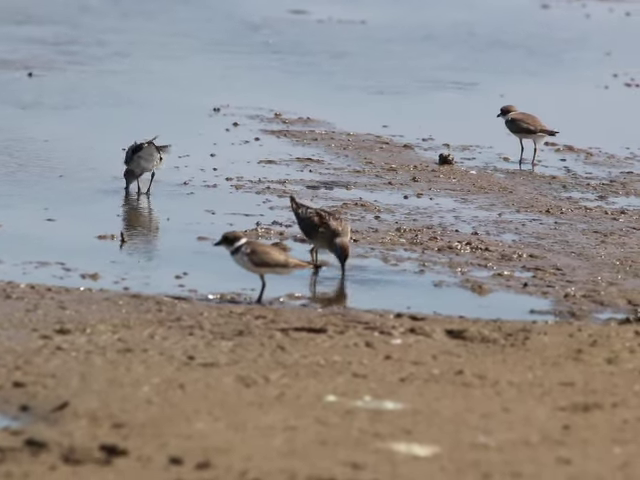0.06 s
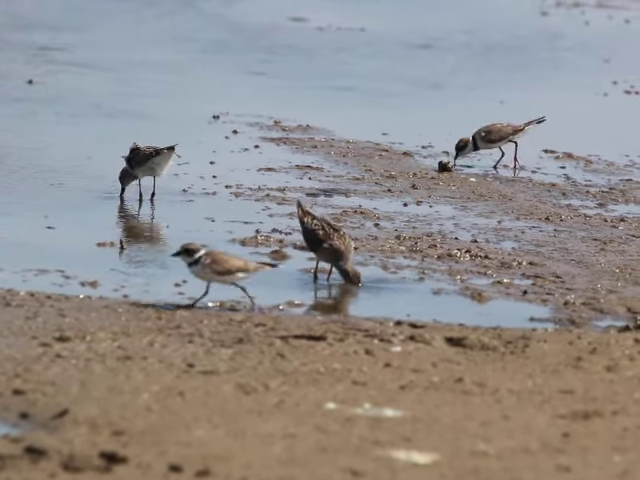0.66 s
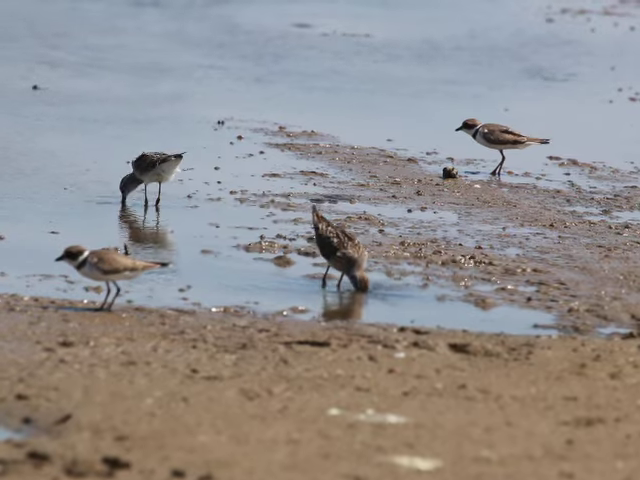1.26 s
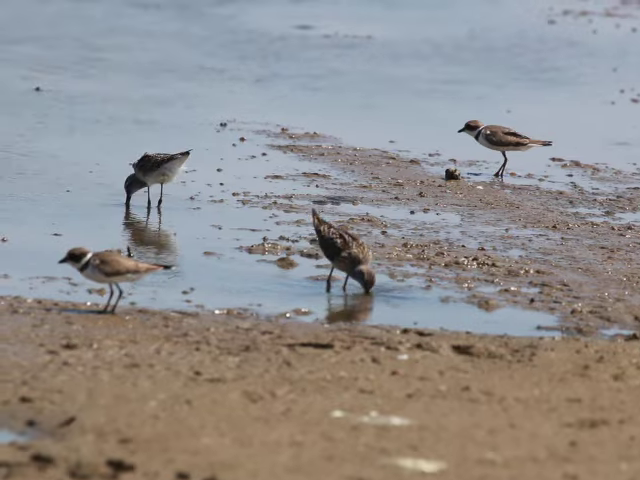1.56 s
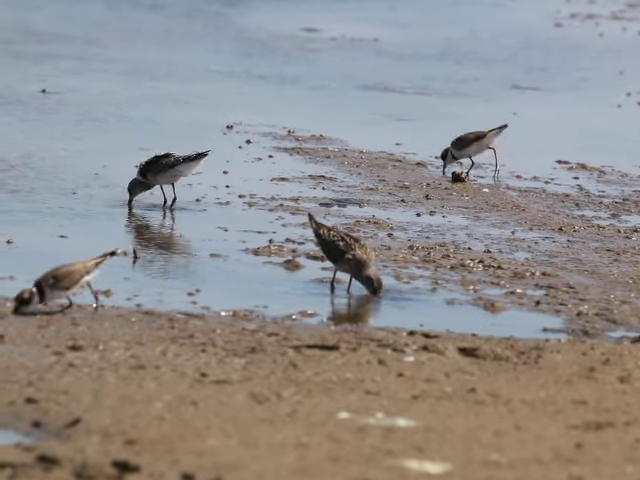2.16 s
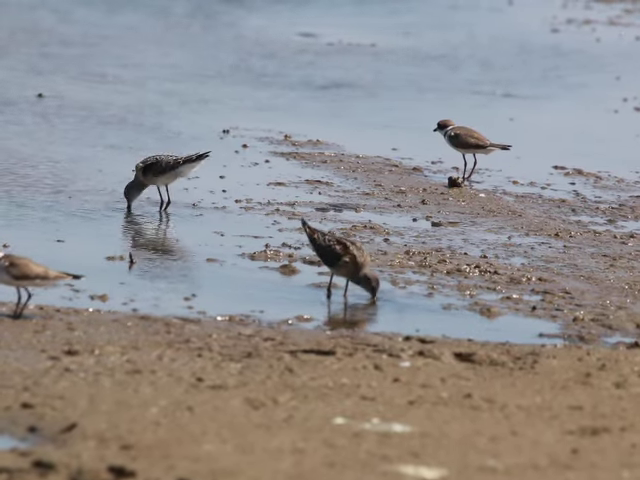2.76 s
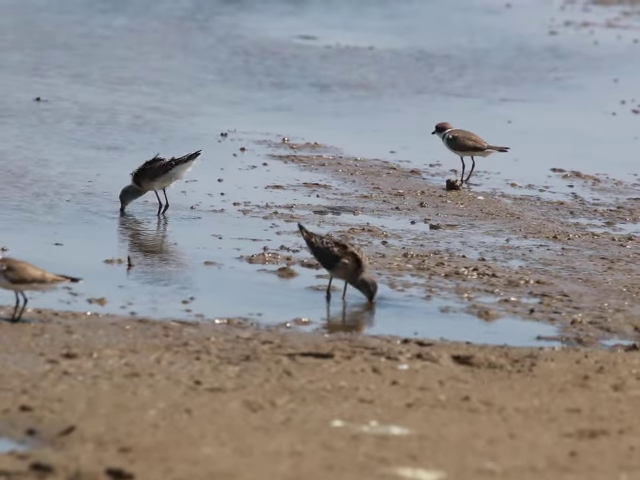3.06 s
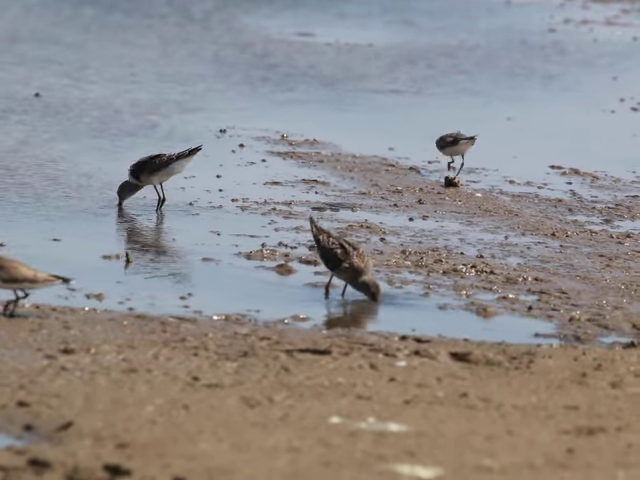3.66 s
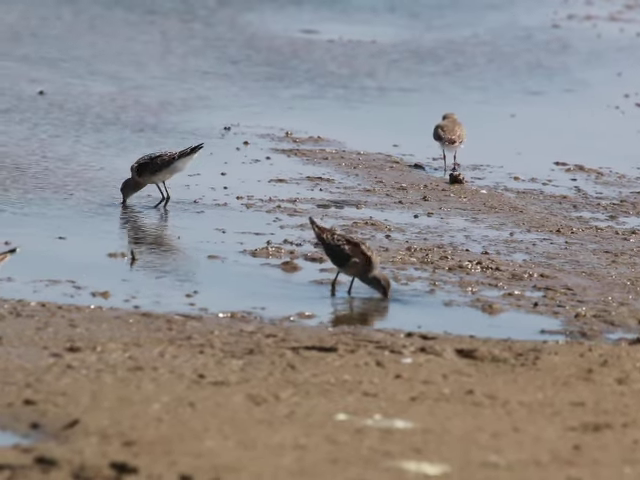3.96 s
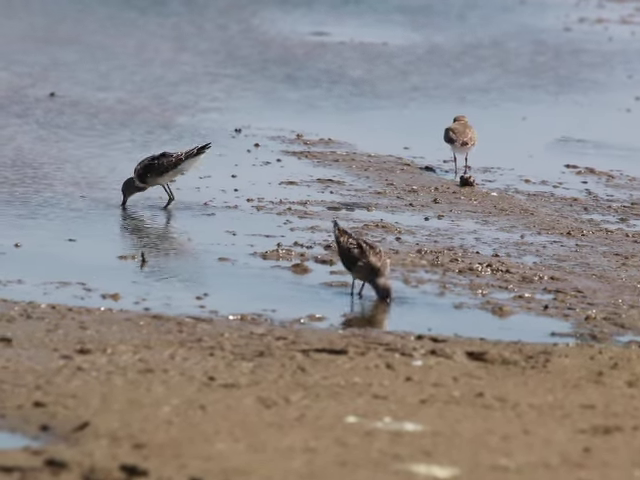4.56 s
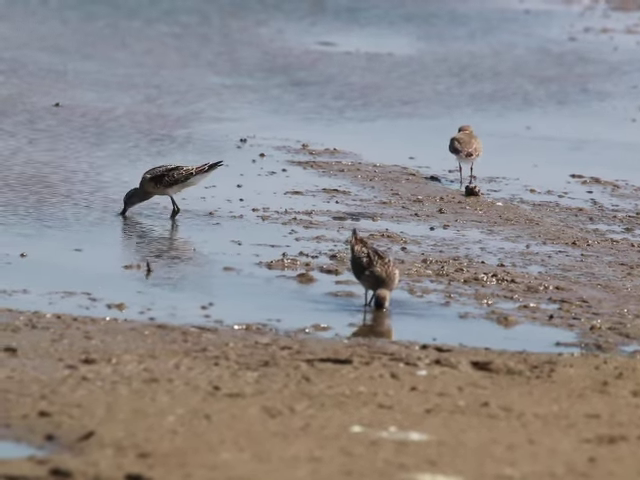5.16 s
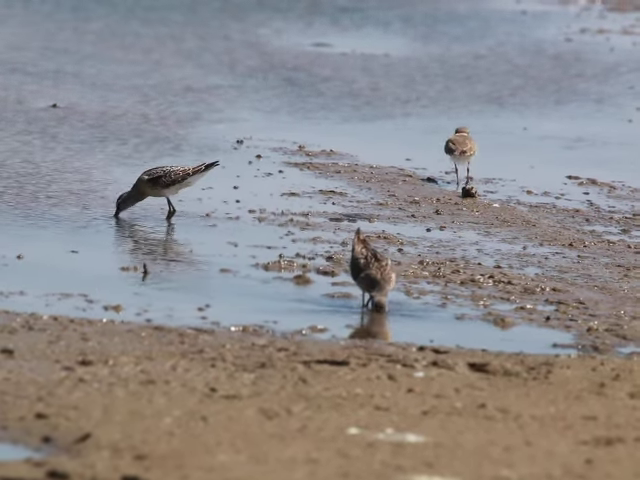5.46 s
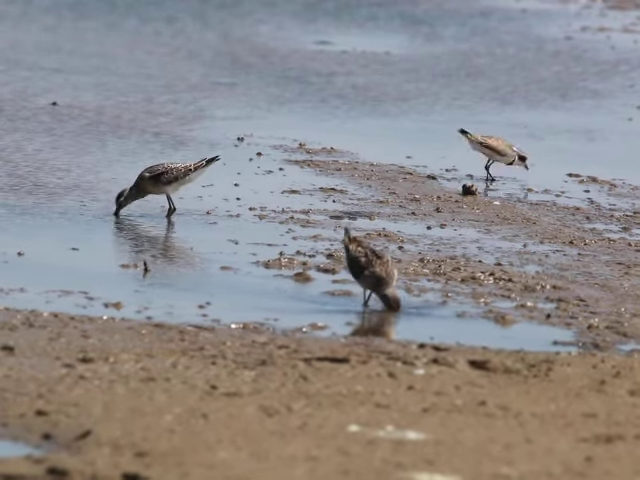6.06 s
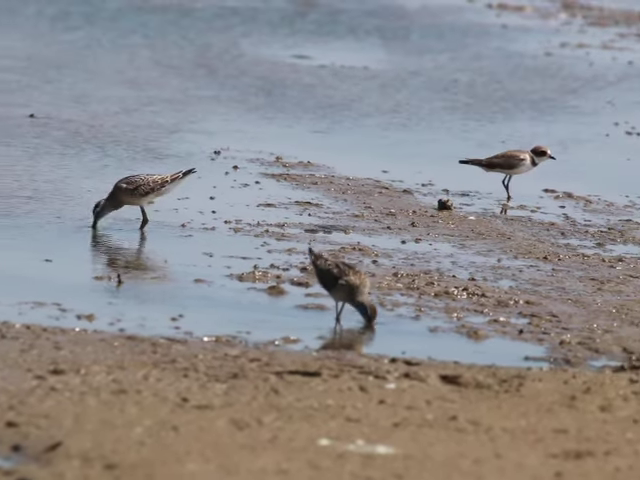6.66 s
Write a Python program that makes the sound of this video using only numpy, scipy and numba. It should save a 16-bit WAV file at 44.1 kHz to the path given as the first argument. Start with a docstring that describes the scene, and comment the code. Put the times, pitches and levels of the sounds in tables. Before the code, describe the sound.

Wind sputters against the microphone on an open mudflat, making a low, ragged rumble broken by short gusts and dull thumps, stronger on the left. The hardest slaps come near the start. The buffeting carries on, sags briefly late on, then picks up again. Behind it lie a soft, steady shore hiss, faint ripples over mud and a few tiny ticks.

```python
"""Gusty wind on a mudflat buffets the two ports of a camera microphone, the left one most.
From the start, short gusts ride a sputtering breeze; eddies thump, and a harder push brightens the rumble.
The hardest slaps land near 0.7 s. Faint ticks come from 1.8 s; the breeze sags near 5.3 s, then picks up.
Behind it all lie shore hiss and soft ripples, which duck whenever the limiter catches a gust."""
import sys
import numpy as np
from scipy import signal
from scipy.fft import rfft, irfft, next_fast_len
from scipy.io import wavfile
from scipy.ndimage import uniform_filter1d, minimum_filter1d
from numba import njit

SR = 44100
rng = np.random.default_rng(int(sys.argv[2]) if len(sys.argv) > 2 else 0)


def log_audio(samples):
    """Write samples as a 16-bit WAV file to the path given in sys.argv[1]."""
    # one column per channel
    frames = np.atleast_2d(samples).T
    # limit to full scale, then quantise
    limited = np.clip(frames, -1, 1)
    pcm = np.round(limited * 32767).astype(np.int16)
    wavfile.write(sys.argv[1], SR, pcm)


N = 305613
TIME_S = np.arange(N) / SR
FREQ_HZ = np.maximum(np.fft.rfftfreq(next_fast_len(N), 1 / SR), 1)

# push between gusts: t/s, force/dB re usual
BREEZE = [(0, -10.5), (.16, -39), (.26, -7.5), (.77, -14), (.85, -19), (1.0, -2.5), (1.14, -4.5),
          (1.27, 4.5), (1.35, -17), (1.58, -11), (1.7, -6.5), (1.98, -10.5), (2.85, -10), (3.85, -10),
          (5.05, -11), (5.24, -24.5), (5.35, -28.5), (5.55, -11.5), (5.7, -10), (6.35, -7), (6.4, -20),
          (6.46, -21), (6.51, -4.5), (6.93, -5)]
# gusts: start/s, length/s, left force/dB, right force/dB, bite (extra brightness)/oct
GUSTS = [(0.045, 0.048, -54, -12, 1.1), (0.408, 0.049, -7, -31, 0.85), (0.537, 0.022, 13, 2, -0.67),
         (0.603, 0.14, 0, -12, 0.59), (0.665, 0.017, 9, 5, 1.22), (0.692, 0.031, 0, -21, 0.91),
         (0.743, 0.027, 10, 2, 0.4), (0.767, 0.033, 14.5, -3, -0.23), (0.912, 0.017, 13, -25, -0.48),
         (1.033, 0.033, -4, 1.5, 0.46), (1.156, 0.013, 5, 6.5, 0.13), (1.177, 0.022, 4, -15, 1.48),
         (1.189, 0.061, -2, 5, 0.0026), (1.485, 0.027, -1.5, -19.5, 1.16), (1.626, 0.058, 10, 4, -0.32),
         (1.745, 0.11, -2, -20, 0.082), (1.869, 0.016, 1, -12, 0.68), (2.07, 0.11, 2.5, -12.5, 0.17),
         (2.189, 0.016, -4, -10, 0.46), (2.216, 0.0076, -19, 7.5, 0.94), (2.231, 0.045, 9, 7.5, 0.13),
         (2.332, 0.054, 3.5, -11, 0.54), (2.471, 0.025, 8, -23, -0.032), (2.567, 0.029, -1, -16, 0.85),
         (2.611, 0.0089, 1, -17, 1), (2.664, 0.023, -0.5, -9.5, 1.1), (2.745, 0.094, -7.5, -16, 0.32),
         (2.945, 0.036, -3.5, 1.5, 0.18), (2.988, 0.045, -2.5, -16, 1.1), (3.078, 0.11, -4.5, -23, 0.9),
         (3.267, 0.05, -3.5, -11.5, 0.24), (3.463, 0.028, 0, 2, 0.23), (3.574, 0.079, -4, -15, 0.33),
         (3.662, 0.024, 6, -9, 0.37), (3.771, 0.017, 10, -16, 0.15), (3.8, 0.038, 2.5, -11.5, -0.3),
         (3.919, 0.041, 12, -0.5, -0.82), (4.113, 0.041, 4.5, 1.5, -0.7), (4.17, 0.026, 7, -6, -0.44),
         (4.316, 0.11, 0, -1.5, 0.11), (4.501, 0.013, 5, -8, -0.025), (4.635, 0.038, 11, -9.5, -0.14),
         (4.879, 0.0057, 17, -10.5, -0.15), (4.918, 0.038, 5.5, 8.5, -0.46), (4.982, 0.056, 0, -17, 0.26),
         (5.174, 0.024, -10, -23, 0.43), (5.29, 0.021, -7, -5, 0.37), (5.386, 0.039, -1.5, -5, -0.086),
         (5.685, 0.026, 15.5, -24, -0.92), (5.848, 0.015, 4, -11, 0.42), (5.945, 0.056, -1.5, -10, -0.063),
         (6.052, 0.0066, 3, 9, 0.028), (6.17, 0.076, -1, -1, 0.17), (6.255, 0.047, -2.5, -1, 0.61),
         (6.315, 0.015, -2.5, -11, 1.17), (6.336, 0.033, -3.5, -9, 0.82), (6.383, 0.0042, -4, -27, 1.06),
         (6.424, 0.013, 5.5, -17, 0.29), (6.468, 0.06, 3, -17, 0.31), (6.544, 0.07, -6, -13.5, 0.99),
         (6.652, 0.027, -4, -6, 0.82), (6.689, 0.054, -2.5, -6.5, 0.42), (6.784, 0.044, -3, -9, 0.72),
         (6.845, 0.077, -3, -10.5, 0.73)]
# biggest single eddies: t/s, port (0 left, 1 right), relative peak/dB, corner f/Hz
SLAPS = [(.056, 1, -2, 497), (0.0664, 1, -6, 850), (0.352, 0, 0, 200), (.454, 0, -12, 636),
         (0.509, 1, -0.5, 187), (0.641, 0, -11, 690), (.66, 1, 16, 383), (.673, 0, 14.5, 614),
         (.7, 0, 2.5, 840), (0.745, 0, 14.5, 267), (.759, 0, 0, 620), (0.795, 0, 8, 171), (1.03, 0, 0, 220),
         (1.037, 1, 8, 250), (1.05, 1, 1.5, 300), (1.058, 1, -7, 520), (1.097, 1, -1.5, 170),
         (1.161, 1, 9, 282), (1.191, 0, 1, 346), (1.233, 0, -8, 740), (1.33, 0, 2, 190),
         (1.497, 0, -9, 844), (1.62, 1, 4.5, 650), (1.634, 0, 7.5, 317), (1.689, 0, 7, 203),
         (1.753, 0, 8.5, 263), (1.878, 0, 8, 395), (2.118, 1, -2, 200), (2.134, 0, -2, 550),
         (2.222, 1, 13, 314), (2.247, 0, 3, 540), (2.316, 1, 3, 191), (2.545, 0, -2, 506),
         (2.62, 0, -1, 630), (2.668, 1, 0.5, 700), (2.684, 0, 2.5, 700), (2.765, 0, 9, 296),
         (2.797, 0, -4, 430), (2.938, 1, 3, 210), (2.97, 0, 1.5, 540), (3.306, 0, 3, 330),
         (3.485, 0, 0.5, 370), (3.593, 0, -3, 477), (3.659, 1, 2, 190), (3.668, 0, 8.5, 450),
         (3.784, 0, 1.5, 327), (3.83, 1, -2, 180), (3.864, 0, -1, 220), (4.077, 1, -7, 168),
         (4.154, 1, -2, 240), (4.326, 1, 4, 200), (4.341, 1, -4.5, 490), (4.428, 0, 6, 190),
         (4.507, 0, 2.5, 547), (4.672, 0, -5, 380), (4.856, 0, 0, 216), (5.004, 0, 0.5, 480),
         (5.03, 1, 0.5, 180), (5.062, 0, 7.5, 202), (5.367, 1, 0.5, 179), (5.416, 0, -3, 493),
         (5.452, 0, -3, 320), (5.635, 0, -9, 190), (5.699, 0, -5, 322), (5.718, 0, 2, 306),
         (5.791, 1, -2.5, 260), (5.863, 0, 1, 343), (5.957, 1, 3, 190), (5.99, 0, -0.5, 570),
         (6.059, 0, 5.5, 327), (6.061, 0, 7, 353), (6.181, 0, 6, 300), (6.24, 0, 4, 476),
         (6.262, 0, 5, 373), (6.309, 0, 2.5, 424), (6.387, 0, 2.5, 517), (6.48, 0, 1, 415),
         (6.603, 0, 0.5, 520), (6.867, 0, 1, 360)]
# port response, thin bass and a small resonance near 1 kHz: f/Hz, gain/dB
PORT_RESPONSE = [(15, -85.5), (28, -48), (45, -18), (75, -12.5), (130, -3.5), (200, 0.8), (320, 2.5),
                 (520, 2), (800, 0), (980, 4), (1200, 1), (2000, 3), (3500, 3), (6000, -2), (9000, -24)]
# shore hiss spectrum: f/Hz, density/(dB per Hz)
SHORE_SPECTRUM = [(40, -66.5), (300, -90), (700, -80), (1200, -85), (1700, -84), (2250, -87.5), (2850, -87),
                  (3300, -92), (4200, -93), (5500, -97.5), (8000, -101), (12000, -105), (15500, -108)]
# slow swell of the hiss: t/s, gain/dB
SHORE_SWELL = [(0, -1), (1.3, -1.3), (2.4, -1), (2.9, -4), (3.3, -2.5), (3.9, 0.5), (4.7, -1), (5.5, -0.5),
               (6.9, -4)]
# likeness of the hiss at the two ports: f/Hz, correlation
SHORE_CORRELATION = [(200, 0.27), (1500, 0.76), (3000, 0.34), (5000, 0.083), (8000, 0.018)]
# ripples washing over mud: t/s, level/dB, centre f/Hz, length/s, half width/oct
RIPPLES = [(.35, -58.5, 2810, 0.4, 0.36), (2.45, -55.5, 2750, 0.45, 0.43), (4.0, -59, 1760, 0.98, 0.21),
           (5.4, -56, 1840, .45, 0.35)]
# close ticks and rustles: t/s, level/dB, centre f/Hz, length/s, half width/oct
TICKS = [(1.812, -43.5, 8200, 0.0048, 0.62), (1.858, -60, 8000, 0.19, 0.96), (1.95, -61, 12300, 0.0093, .5),
         (2.635, -64, 7400, 0.017, .15), (3.782, -61, 7300, 0.034, .3), (4.65, -59, 7400, 0.009, 0.31),
         (4.731, -59, 7450, .012, .25), (4.846, -60, 7000, 0.03, .35), (4.912, -54, 8900, 0.0025, .4),
         (5.693, -49, 3080, .005, .05), (6.6595, -47, 3450, 0.0035, 0.065), (6.659, -52, 7770, 0.0016, .8),
         (6.852, -55, 5200, 0.0048, .7)]
# pressure at which the capsules bottom out: left level/dB, right level/dB
CAPSULE_LIMIT_DB = [9, 4.5]


def wind(port, flutter_db, ragged_db, puff_hz, trim_db, brightening, bass_db):
    """Rumble on one port: the eddy spectrum dies away above a corner that rises with the force."""
    steady_flow_db, crackle_oct = -17, 0.22
    usual_density_db, usual_corner_hz, shelf_hz = -33.5, 250, 98
    push_db, bite_oct = wind_force(port)
    lull = 1 / (1 + undb(push_db - steady_flow_db) ** 2)  # weak flow breaks off and reattaches
    push_db += ragged_db * lull * np.tanh(2 * wander(puff_hz))
    push_db += flutter_db * np.tanh(wander(rate_hz=94.5)) + trim_db
    bite_oct += crackle_oct * (np.tanh(wander(rate_hz=26.7)) - .5)
    corner_hz = usual_corner_hz * undb(brightening * push_db) * 2 ** bite_oct
    pressure = eddies(kicks_per_s=800, spread_db=4.0, turbulence=0.38)
    centres_hz = 110 * 1.5 ** np.arange(11)
    rumble = np.zeros(N)
    for hz, share in zip(centres_hz, np.eye(len(centres_hz))):
        band = filtered(pressure, np.interp(np.log(FREQ_HZ), np.log(centres_hz), share))
        rumble += band * np.exp(-hz / corner_hz)
    rumble *= undb(usual_density_db + .5 * push_db) * np.sqrt(SR / 2)  # grows more slowly than the force
    shelf = undb(bass_db / (1 + (FREQ_HZ / shelf_hz) ** 4))
    return port_ring(filtered(rumble + slaps(port, trim_db=-4.5), shelf))


def wind_force(port):
    """Push/dB and bite/oct on one port: the breeze plus gusts that rise, arch and leave a dying wake."""
    attack_s, wake_s, arch_db = 0.0088, 0.0066, 1
    lee_db = -6.5  # right port is sheltered from the breeze
    power = undb(at_time(BREEZE) + port * lee_db) ** 2
    weighted_bite = np.zeros(N)
    for start_s, length_s, left_db, right_db, bite_oct in GUSTS:
        near = (TIME_S > start_s - attack_s) & (TIME_S < start_s + length_s + 10 * wake_s)
        age_s = TIME_S[near] - start_s
        rise = np.clip(age_s / attack_s + .5, 0, 1)
        wake = np.exp(-np.maximum(age_s - length_s, 0) / wake_s)
        swell_db = arch_db * (np.sin(np.pi * np.clip(age_s / length_s, 0, 1)) - .5)
        gust_power = (rise * wake * undb((left_db, right_db)[port] + swell_db)) ** 2
        power[near] += gust_power
        weighted_bite[near] += bite_oct * gust_power
    return 10 * np.log10(power), weighted_bite / power


def eddies(kicks_per_s, spread_db, turbulence):
    """Unequal pressure kicks in fine turbulence, at an even mean power."""
    kicks = (rng.random(N) < kicks_per_s / SR) * rng.choice([-1, 1], N)
    kicks = kicks * undb(spread_db * rng.standard_normal(N))
    pressure = kicks / kicks.std() + turbulence * rng.standard_normal(N)
    return pressure / np.sqrt(uniform_filter1d(pressure ** 2, size=700))


def slaps(port, trim_db):
    """Single pressure spikes, pushing or sucking; a higher corner means a narrower spike."""
    pressure = np.zeros(N)
    for t_s, side, peak_db, corner_hz in SLAPS:
        if round(side) == port:
            peak = rng.choice([-1, 1]) * undb(peak_db + trim_db)
            pressure += peak / (1 + (2 * np.pi * corner_hz * (TIME_S - t_s)) ** 2)
    return pressure


def port_ring(pressure, size=4096):
    """The port rings after each kick: a minimum-phase response built from its gains."""
    hz = np.maximum(np.fft.rfftfreq(size, 1 / SR), 1)
    cepstrum = irfft(np.log(undb(at_hz(PORT_RESPONSE, hz))))[:size // 2]
    cepstrum[1:] *= 2
    impulse_response = irfft(np.exp(rfft(cepstrum, size)))
    return signal.fftconvolve(pressure, impulse_response)[:N]


def shore(waver_db):
    """Distant hiss of water and air, wider toward the treble."""
    correlation = np.clip(at_hz(SHORE_CORRELATION, FREQ_HZ), 0, 1)
    spectrum = undb(at_hz(SHORE_SPECTRUM, FREQ_HZ)) * np.sqrt(SR / 2)
    mid = filtered(rng.standard_normal(N), spectrum * np.sqrt((1 + correlation) / 2))
    side = filtered(rng.standard_normal(N), spectrum * np.sqrt((1 - correlation) / 2))
    swell_db = at_time(SHORE_SWELL) + waver_db * wander(rate_hz=28)
    return np.array([mid + side, mid - side]) * undb(swell_db)


def noise_swells(table, pan_right_db):
    """Ripples or ticks: noise bands that swell and fade."""
    out = np.zeros((2, N))
    noise = rng.standard_normal((2, N))
    for t_s, level_db, centre_hz, length_s, half_width_oct in table:
        band = filtered(noise, 1 / (1 + (np.log2(FREQ_HZ / centre_hz) / half_width_oct) ** 2))
        envelope = np.exp(-2 * ((TIME_S - t_s) / length_s) ** 2)
        out += undb(level_db) * band / band.std() * envelope
    return out * undb([[-pan_right_db], [pan_right_db]])


def limiter(x, ceiling_db, release_s):
    """One gain for both channels: dips just ahead of a peak, holds 40 ms, recovers slowly."""
    excess = np.maximum(np.abs(x).max(axis=0) / undb(ceiling_db), 1)
    gain = np.exp(-peak_envelope(np.log(excess), 1 / (1 + release_s * SR)))
    held = minimum_filter1d(gain, size=1761, origin=800)
    return x * uniform_filter1d(uniform_filter1d(held, size=80), size=80)


@njit
def peak_envelope(x, decay_per_sample):
    """Instant rise, slow fall."""
    out, level = np.empty(len(x)), 0.
    for i in range(len(x)):
        level = max(x[i], level * (1 - decay_per_sample))
        out[i] = level
    return out


def wander(rate_hz):
    """Smooth random drift of unit spread."""
    drift = filtered(rng.standard_normal(N), np.exp(-(FREQ_HZ / rate_hz) ** 2))
    return drift / drift.std()


def filtered(x, gain):
    """Apply one gain per frequency."""
    size = next_fast_len(N)
    return irfft(rfft(x, size) * gain, size)[..., :N]


def at_time(table):
    """Interpolate (t/s, value) rows at every sample."""
    return np.interp(TIME_S, *np.transpose(table))


def at_hz(table, hz):
    """Interpolate (f/Hz, value) rows on a log axis."""
    points_hz, values = np.transpose(table)
    return np.interp(np.log(hz), np.log(points_hz), values)


def undb(db):
    """Decibels to gain."""
    return 10 ** (np.asarray(db) / 20)


def scene():
    """Each port has its own eddies; both hear shore, ripples and ticks."""
    left = wind(0, flutter_db=7, ragged_db=18, puff_hz=9.1, trim_db=-2.5, brightening=0.18, bass_db=-1.5)
    right = wind(1, flutter_db=5.5, ragged_db=13.5, puff_hz=8.1, trim_db=-3.5, brightening=0.24,
                 bass_db=1.5)
    hiss = shore(waver_db=0.92)
    ripples = noise_swells(RIPPLES, pan_right_db=1.0)
    ticks = noise_swells(TICKS, pan_right_db=0.5)
    return np.array([left, right]) + hiss + ripples + ticks


def record(dry):
    """Capsules clip the hardest slaps; the camera limits gusts and cuts the top; the ends fade."""
    cutoff_hz = 15800
    low_pass = signal.ellip(10, .1, 80, cutoff_hz, fs=SR, output="sos")
    end_fades = signal.windows.tukey(N, .001)
    capsule_limit = undb(CAPSULE_LIMIT_DB)[:, None]
    clipped = np.clip(dry, -capsule_limit, capsule_limit)
    limited = limiter(clipped, ceiling_db=-0.86, release_s=0.12)
    return signal.sosfilt(low_pass, limited * end_fades)


dry = scene()
out = record(dry)
log_audio(out)
```